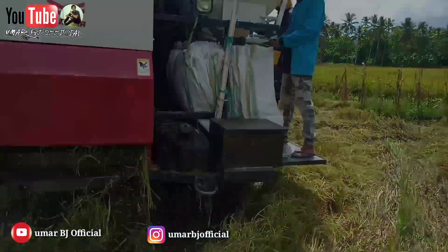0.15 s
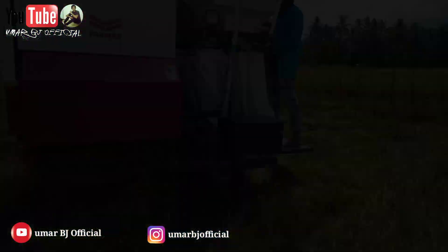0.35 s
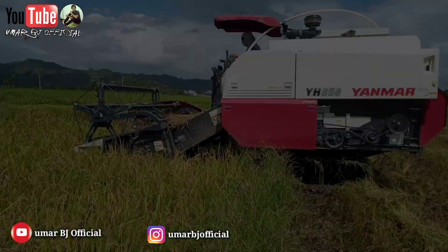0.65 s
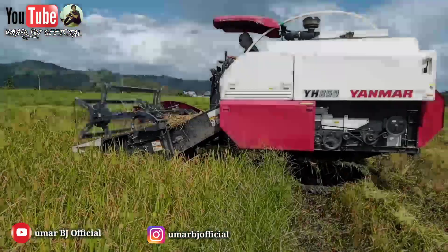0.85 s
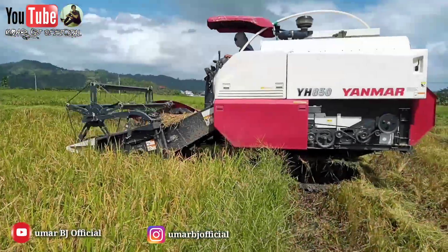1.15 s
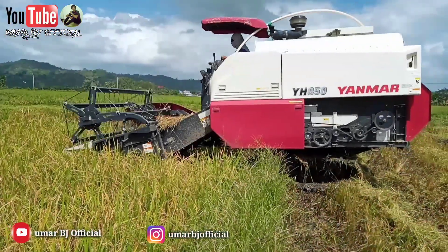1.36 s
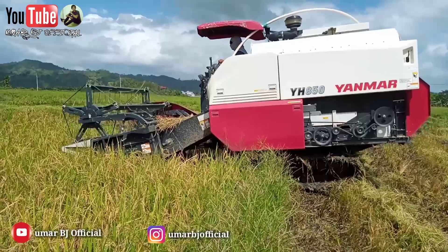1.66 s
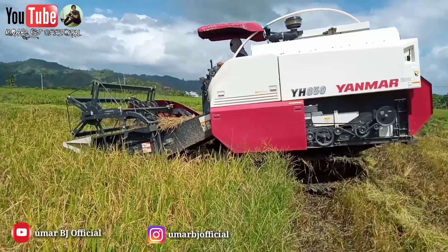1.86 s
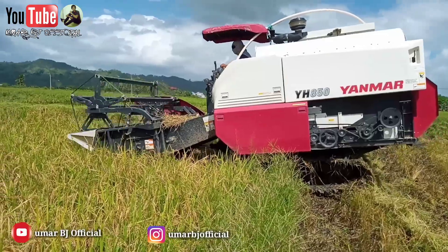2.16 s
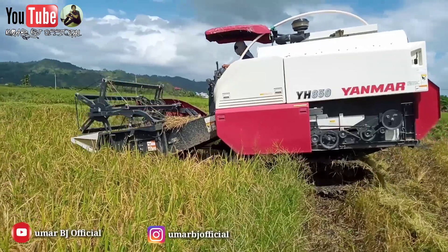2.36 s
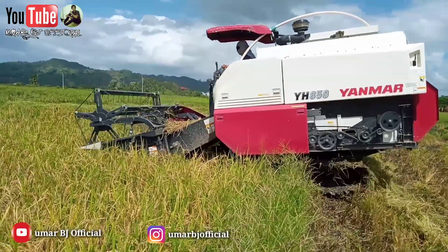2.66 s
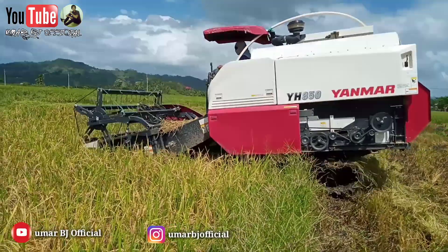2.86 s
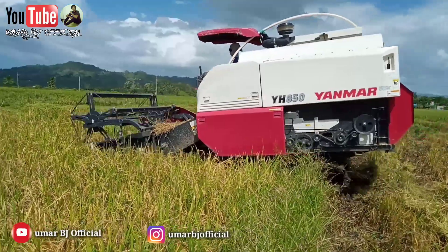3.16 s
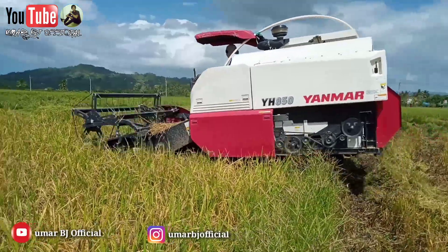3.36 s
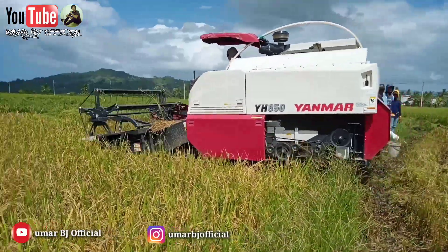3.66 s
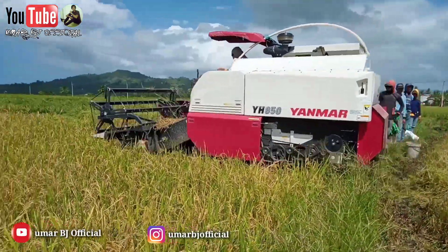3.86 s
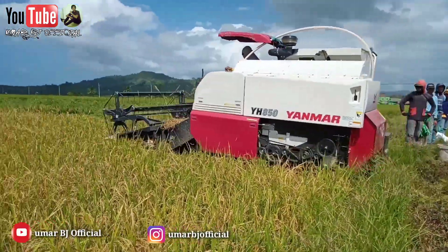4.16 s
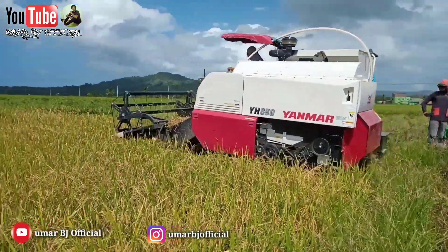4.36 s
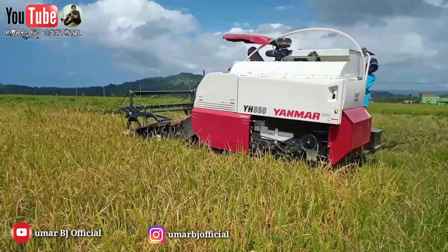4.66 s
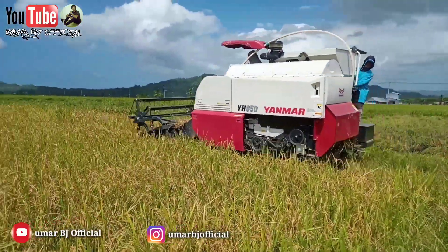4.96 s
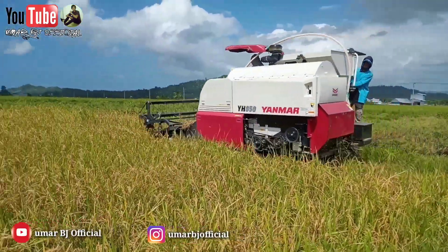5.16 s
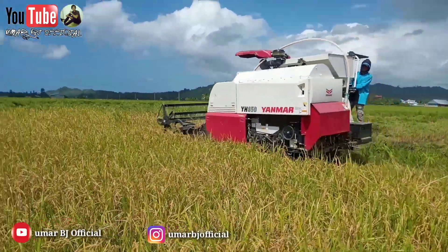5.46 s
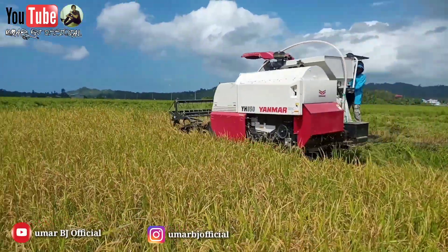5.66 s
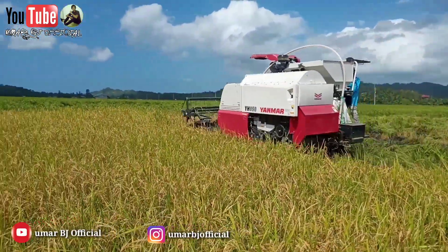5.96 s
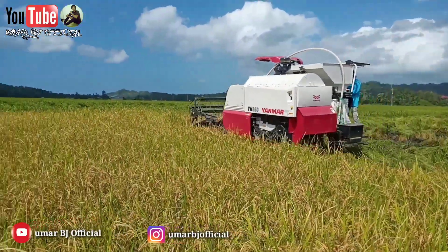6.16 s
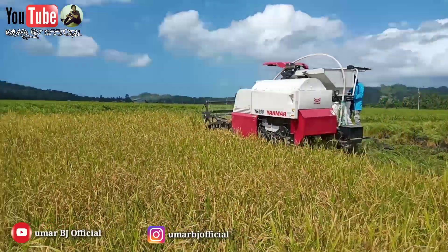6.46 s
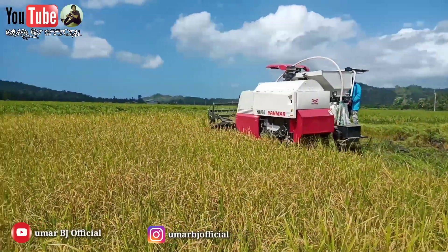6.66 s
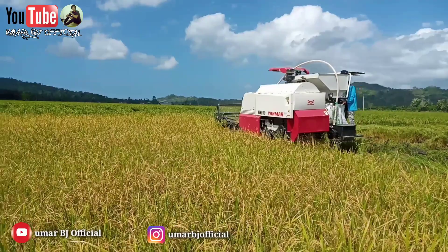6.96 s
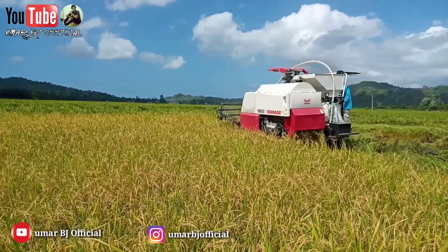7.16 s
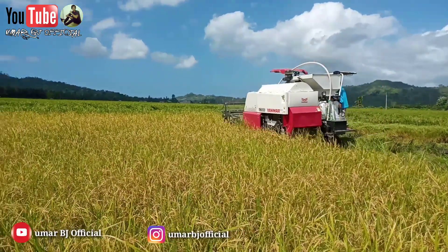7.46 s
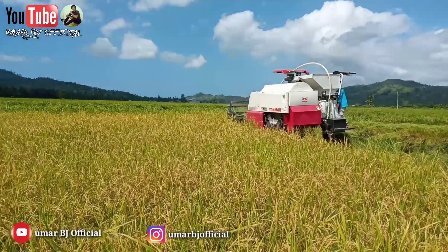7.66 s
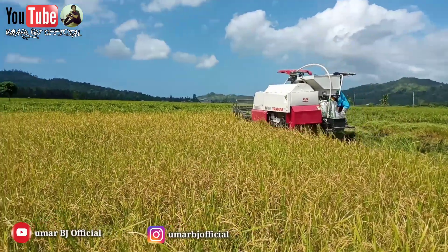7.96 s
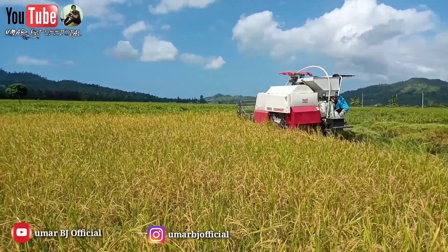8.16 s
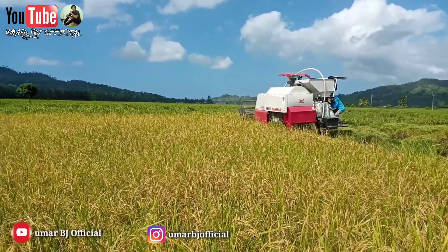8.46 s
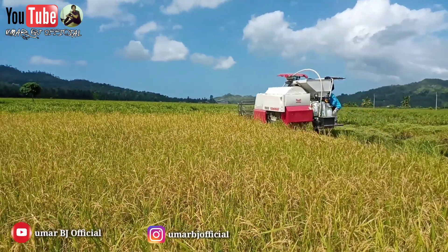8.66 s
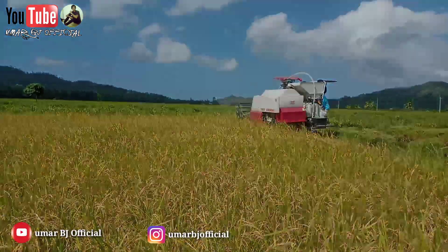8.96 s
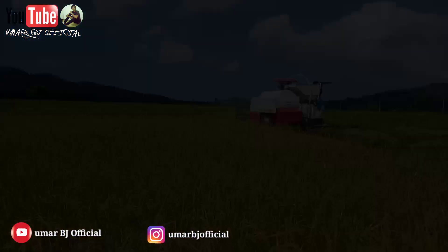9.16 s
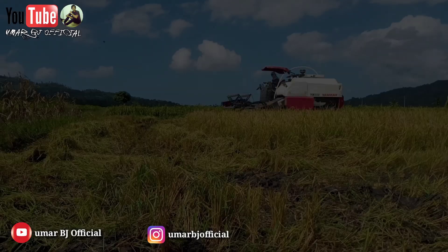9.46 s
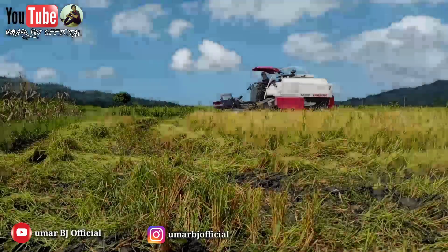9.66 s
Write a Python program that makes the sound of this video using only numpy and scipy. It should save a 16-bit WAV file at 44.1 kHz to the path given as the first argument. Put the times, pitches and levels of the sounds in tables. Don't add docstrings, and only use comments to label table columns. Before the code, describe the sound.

A diesel combine harvester roars and rattles in an open rice field, fading to silence twice as the view changes and it drives off.

```python
import sys
import numpy as np
from scipy import signal
from scipy.fft import rfft, irfft, next_fast_len
from scipy.io import wavfile
from scipy.ndimage import uniform_filter1d

SR = 44100
rng = np.random.default_rng(int(sys.argv[2]) if len(sys.argv) > 2 else 0)


def output_pcm(signal):
    pcm = np.clip(np.atleast_2d(signal).T, -1, 1) * 32767
    wavfile.write(sys.argv[1], SR, np.round(pcm).astype(np.int16))


def makeup_ratio(level_db):
    decades = np.asarray(level_db, float) / 20
    return 10 ** decades


N = 433045
T = np.arange(N) / SR

PART_LEVELS = {"drum": (-3.5, -2, -3.5, -1), "panels": (-2.5, -6.5, -7, -9.5),
               "chains": (-8, -12, -13, -12.5), "chaff": (-39, -36.5, -37, -39),
               "dust": (-46, -50.5, -52.5, -54), "thud": (-6.5, -12, -10, -9.5),
               "shake": (-22, -18.5, -24.5, -19)}
# start in seconds, peak in dB, ring in dB and top in dB against the peak.
CLANKS = [(0.882, -39, 16, -28.5), (0.93, -37.5, 12, -19.5), (0.994, -37.5, 17, -19), (1.135, -36, 1, -30),
          (1.1551, -30, 7, -27), (1.379, -27.5, 11, -23.5), (1.434, -29.5, 13, -31), (1.4894, -23, 12, -20),
          (1.558, -32.5, 19, -29), (1.59, -32, -2, -26), (1.6056, -15, 3, -27), (1.6145, -23, 11, -20),
          (1.7184, -26.5, 13, -28.5), (1.9663, -33.5, 6.5, -19.5), (2.142, -31, 6, -22),
          (2.178, -32, 13, -27.5), (2.212, -30, 1, -29), (2.252, -26, 8.5, -28.5),
          (2.362, -27, 13.5, -24.5), (2.51, -35, 5, -27.5), (2.579, -39, 23, -24), (2.6303, -29.5, 10, -23),
          (2.75, -39, 16, -22), (2.8757, -27.5, 13, -20.5), (3.5701, -33, 14, -27), (3.85, -32.5, 10, -27),
          (3.953, -35, 8.5, -26), (4.081, -27.5, 8, -17), (5.4095, -32.5, 4, -20), (9.615, -49, 5, -22)]
# frequency in Hz, level in dB, decay by 60 dB in seconds.
BAR_MODES = [(1750, -1.5, 0.0084), (2340, 1, 0.0093), (2750, -6, 0.0098), (3160, -3.5, .012),
             (3440, -2.5, 0.014), (3720, 1, 0.013), (3900, -6, 0.018), (4330, -15.5, 0.018),
             (4810, -10.5, 0.033)]
# frequency in Hz, density in dB per Hz.
ROAR_SPECTRUM = [(36, -32.5), (60, -15), (87, -6.5), (130, -2), (290, -2.5), (370, -9.5), (720, -11),
                 (815, -15), (1000, -14), (1300, -16), (1660, -20), (2460, -24.5), (3400, -23),
                 (4760, -36.5)]
# frequency in Hz, density in dB per Hz.
HISS_SPECTRUM = [(4600, 5), (5000, -8.5), (5650, -10), (6300, -4.5), (7200, -8.0), (8200, -12.5),
                 (9200, -18.5), (10200, -26), (11200, -24.5), (12300, -22), (13500, -24), (14500, -22.5),
                 (15400, -23.5)]
# start and end in seconds, frequency and width in Hz,
# level in dB.
PASSING_SINGERS = [(.5, 3.2, 670, 150, -16), (4.8, 6.5, 622, 3, -18.5), (6.5, 9.4, 630, 60, -22),
                   (1, 4.8, 2230, 100, -30), (1, 4.2, 1700, 110, -24), (7.2, 8.9, 1590, 60, -23),
                   (4.3, 7.6, 2730, 130, -20), (7.8, 9.4, 2730, 140, -21.5), (6.6, 9, 2170, 150, -22),
                   (5.4, 7.4, 3210, 160, -19), (7.45, 8, 3070, 50, -21), (4.4, 9.4, 280, 24, -12),
                   (5.6, 9.4, 139, 14, -12.5), (2.8, 6.8, 191, 20, -12.5), (.9, 2, 210, 30, -16.5),
                   (2.6, 4.9, 1270, 90, -17), (6.8, 9.3, 960, 120, -25.5), (5.6, 9.3, 13500, 500, -62),
                   (5.8, 8.6, 357, 12, -29.5), (5.9, 6.8, 1670, 60, -19)]
# frequency in Hz, width in Hz, level in dB.
CLOSE_SINGERS = [(667, 100, -10), (1563, 200, -10), (1095, 170, -18), (2130, 160, -14.5), (2630, 120, -17),
                 (4500, 100, -33), (6700, 900, -36), (13700, 1200, -46)]
# frequency in Hz, width in Hz, level in dB.
FAR_SINGERS = [(1250, 100, -15.5), (1420, 90, -16.5), (1760, 150, -15.5), (430, 140, -8), (3350, 230, -22)]
# time in seconds, level in dB, engine load in dB, ground echo share from 0 to 1.
DRIVE = [(.7, -11.5, 0.5, .35), (.83, -6, -1, 0.4), (1.02, -9.5, 1.5, .3), (1.3, -12.5, 3.5, 0.32),
         (1.9, -14.5, 3, 0.23), (2.5, -14, 2, 0.35), (2.8, -16.5, 2.5, 0.31), (3.4, -16.5, 0.5, .27),
         (4.0, -16.5, -4.5, 0.31), (4.6, -17, -2.5, .15), (5.2, -16, -2, 0.09), (5.8, -17.5, -1.5, 0.12),
         (6.4, -16, 0, 0.14), (7.0, -17, 0, 0.12), (7.6, -17, 0.5, 0.33), (8.1, -19, 1.5, .4),
         (8.8, -20, .5, 0.23)]
GAPS = [
    (.675, .61, .668, .648),
    (9.45, 9.4, 9.492, 9.455),
]

CUTS_S = (0.64, 9.452)
# start and end in seconds, frequency and width in Hz, level in dB.
SLOT, SLOT_RISE_HZ = (5, 7.5, 1540, 160, -17), 243
TURN_S, TURNED_S = 4.3, 6.4
FIRING_HZ, KNIFE_HZ = 97.5, 11
ECHO_S, ECHO_PEAK_HZ = 0.001894, 602.4
CLOSE_ECHO, FAR_ECHO = 0.12, 0.13
THROB_HZ, THROB_PEAK_S = 7.5, 6.95
FIRST_DB, FIRST_SAG_DB_PER_S, LAST_DB, MAKEUP_DB = -19.5, 8, -20, 1
SURGE_DB, SURGE_RATE = 0.34, 11
FADE_S, FADE_POWER, GATE_EDGE_S = 0.57, 2.006, 0.017
CRACK_HZ, CRACK_HZ_PER_DB, CRACK_SPREAD = 6200, 68, 0.03
CLANK_S, LINGER_PER_DB = 0.0076, 0.03
TICKS_FROM_S, TICKS_THIN_S, TICKS_LAST_S = 0.85, 2.6, 8
TICK_DB, TICK_SAG_DB_PER_S, TICK_RING_DB, TICK_TOP_DB = -40, -0.3, 10.5, -24


def level(x):
    return x / np.sqrt(np.mean(x ** 2))


def columns(table):
    s, *rest = np.transpose(table)
    return [np.interp(T, s, c) for c in rest]


def between(close, long, far):
    return np.where(T < CUTS_S[0], close, np.where(T > CUTS_S[1], far, long))


def by_view(values):
    close, side, off, far = values
    return between(close, np.interp(T, [TURN_S, TURNED_S], [side, off]), far)


def colour(x, table, lo_hz, hi_hz):
    size = next_fast_len(N)
    f = np.arange(size // 2 + 1) * SR / size + 1
    hz, db = np.transpose(table)
    edges = 1 / np.sqrt((1 + (lo_hz / f) ** 12) * (1 + (f / hi_hz) ** 12))
    shape = makeup_ratio(np.interp(np.log(f), np.log(hz), db)) * edges
    return level(irfft(rfft(x, size) * shape, size)[:N])


def band(x, lo_hz, hi_hz):
    return signal.sosfilt(signal.butter(2, [lo_hz, hi_hz], "band", fs=SR, output="sos"), x)


def walk(rate, size=N):
    k = int(SR / rate)
    held = np.repeat(rng.standard_normal(size // k + 1), k)[:size]
    return level(uniform_filter1d(uniform_filter1d(held, k), k))


def knocks(rate, spread_db, tail_s):
    when, size = rng.random((2, int(rate * N / SR)))
    hits = np.bincount((when * N).astype(int), makeup_ratio(-spread_db * np.log(size)), N)
    return level(signal.lfilter([1], [1, -np.exp(-1 / (tail_s * SR))], hits))


def engine(thud_db, hz, shake_db):
    turn = np.cumsum(hz + 3.5 * walk(22)) / SR
    fired = np.diff(np.floor(turn), prepend=0) * makeup_ratio(2.8 * walk(18) + 2.5 * walk(90))
    boom = band(band(fired, 86, 114), 80, 139)
    thud = level(boom + makeup_ratio(-8) * band(fired, 170, 310))
    shake = colour(rng.standard_normal(N), ROAR_SPECTRUM, 12, 78.6)
    return makeup_ratio(thud_db) * thud + makeup_ratio(shake_db) * shake, turn % 1


def thresher(drum_db, panels_db, chains_db, chaff_db, dust_db, cycle):
    stroke_phase = np.cumsum(KNIFE_HZ + 0.79 * walk(1.2)) / SR % 1
    stroke = np.exp(-stroke_phase / 0.14) * makeup_ratio(1.8 * walk(12))
    knock = knocks(70, 1.1, 0.008)
    puff = np.exp(-cycle / 1.3)
    noise = rng.standard_normal((4, N))
    drum = noise[0] * (makeup_ratio(0.6 * walk(25)) + 0.062 * knock)
    panels = noise[1] * (makeup_ratio(0.2 * walk(30)) + 0.22 * knock + 0.72 * puff)
    chains = noise[2] * (makeup_ratio(0.83 * walk(20)) + 0.19 * knock + 0.33 * puff + 0.072 * stroke)
    chaff = noise[3] * (makeup_ratio(0.8 * walk(20)) + 0.3 * knock + 0.33 * stroke)
    dust = noise[3] * (1 + 0.25 * knock + 0.3 * stroke)
    crop = makeup_ratio(drum_db) * colour(drum, ROAR_SPECTRUM, 117, 368)
    crop += makeup_ratio(panels_db) * colour(panels, ROAR_SPECTRUM, 356, 1330)
    crop += makeup_ratio(chains_db) * colour(chains, ROAR_SPECTRUM, 1456, 4310)
    crop += makeup_ratio(chaff_db) * colour(chaff, HISS_SPECTRUM, 5340, 10200)
    return crop + makeup_ratio(dust_db) * colour(dust, HISS_SPECTRUM, 10200, 15600)


def ground(x, share):
    size = next_fast_len(N)
    f = np.arange(size // 2 + 1) * SR / size
    delay = np.exp(-2j * np.pi * (f - ECHO_PEAK_HZ) * ECHO_S)
    late = irfft(rfft(x, size) * delay / (1 + (f / 2600) ** 4), size)[:N]
    share = np.clip(share, 0, 0.9)
    return (x + share * late) / np.sqrt(1 + share ** 2)


def singers():
    out = np.zeros(N + 2 * SR)
    first, last = CUTS_S
    close = [(-first / 2, first, *row) for row in CLOSE_SINGERS]
    far = [(last, last + first, *row) for row in FAR_SINGERS]
    for row in [*PASSING_SINGERS, *close, *far, SLOT]:
        start, end, hz, width_hz, db = row
        along = np.linspace(0, 1, int((end - start) * SR))
        rise_hz = SLOT_RISE_HZ if row is SLOT else 0
        angle = 2 * np.pi * np.cumsum(hz + rise_hz * along) / SR
        shiver = walk(2 * width_hz, len(along)) * np.cos(angle)
        shiver += walk(2 * width_hz, len(along)) * np.sin(angle)
        shiver += 18 / (6 + width_hz) * np.cos(angle)
        swell = np.abs(np.sin(np.pi * along)) ** 0.55
        out[int((start + 1) * SR):][:len(along)] += makeup_ratio(db) * swell * shiver
    return out[SR:SR + N]


def fades():
    gain = 1
    for sunk, shut, opened, rising in GAPS:
        gate = np.clip(np.maximum(shut - T, T - opened) / GATE_EDGE_S, 0, 1)
        slope = np.clip(np.where(T < shut, sunk - T, T - rising) / FADE_S, 0, 1)
        gain = gain * gate * slope ** FADE_POWER
    return gain


def ticks(count):
    when, size, ring, top = rng.random((count, 4)).T
    late_s = -TICKS_THIN_S * np.log(when) % TICKS_LAST_S
    peak_db = TICK_DB - TICK_SAG_DB_PER_S * late_s + 7 * (size - 0.5)
    ring_db = TICK_RING_DB + 9 * (ring - 0.5)
    top_db = TICK_TOP_DB + 8 * (top - 0.5)
    return list(zip(TICKS_FROM_S + late_s, peak_db, ring_db, top_db))


def knife():
    crack, ring, top = np.zeros((3, N + SR))
    span = np.arange(4096) / SR
    for s, db, ring_db, top_db in [*CLANKS, *ticks(60)]:
        noise = rng.standard_normal(4096)
        hz = (CRACK_HZ + CRACK_HZ_PER_DB * max(db + 25.5, 0)) * (1 + CRACK_SPREAD * noise[0])
        length_s = CLANK_S * (1 + LINGER_PER_DB * max(db + 30, 0))
        fall = np.exp(-span / length_s) + 0.11 * np.exp(-span / 0.021)
        rattle = makeup_ratio(db) * noise * fall * np.minimum(span / 0.001, 1)
        at = slice(int(s * SR), int(s * SR) + len(span))
        crack[at] += band(rattle, 0.84 * hz, 1.24 * hz) + 0.25 * band(rattle, 4600, 8600)
        ring[at] += makeup_ratio(ring_db) * rattle
        top[at] += makeup_ratio(top_db) * rattle
    modes = np.zeros(len(span))
    for hz, db, t60 in BAR_MODES:
        modes += makeup_ratio(db) * np.exp(-np.log(1000) * span / t60) * np.sin(2 * np.pi * hz * span)
    rung = band(band(signal.fftconvolve(ring, modes)[:N], 900, 4660), 900, 4660)
    return makeup_ratio(-2.5) * crack[:N] + makeup_ratio(-23) * rung + makeup_ratio(4.5) * band(top, 10000, 15000)[:N]


def scene():
    part = {name: by_view(db) for name, db in PART_LEVELS.items()}
    drive_db, load_db, long_echo = columns(DRIVE)
    throb_db = by_view((0.1, 0.5, 3.5, 0.1)) * np.cos(2 * np.pi * THROB_HZ * (T - THROB_PEAK_S))
    motor, cycle = engine(part["thud"] + load_db + throb_db, FIRING_HZ, part["shake"])
    crop = thresher(part["drum"], part["panels"], part["chains"], part["chaff"], part["dust"], cycle)
    machine = ground(crop, between(CLOSE_ECHO, long_echo, FAR_ECHO)) + motor + makeup_ratio(-0.1) * singers()
    level_db = between(FIRST_DB - FIRST_SAG_DB_PER_S * T, drive_db, LAST_DB)
    level_db = level_db + MAKEUP_DB + SURGE_DB * walk(SURGE_RATE)
    fade = fades()
    return (machine * makeup_ratio(level_db) * fade + knife() * (fade > 0.003))[None]


def band_limit(x):
    return signal.sosfilt(signal.butter(12, 15500, fs=SR, output="sos"), x)


def record(dry):
    rounded = np.tanh(0.73 * dry) / 0.77
    low_pass = signal.ellip(8, 0.2, 60, 15500, fs=SR, output="sos")
    mix = signal.sosfilt(low_pass, rounded)
    return band_limit(mix)


dry = scene()
out = record(dry)
output_pcm(out)
```